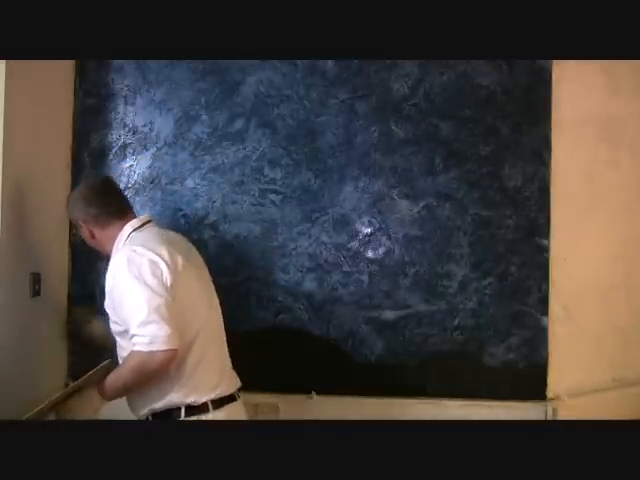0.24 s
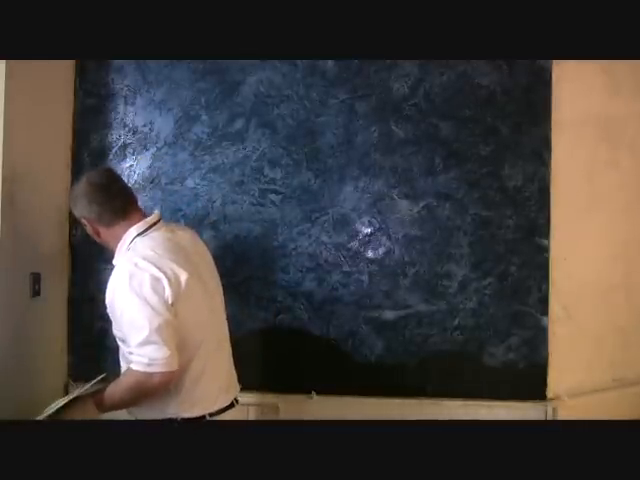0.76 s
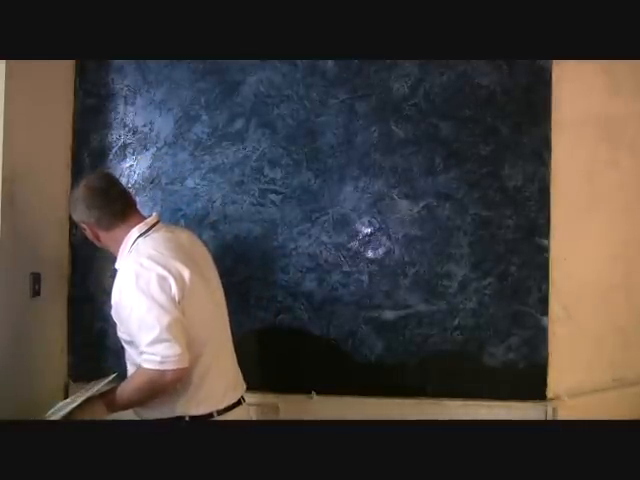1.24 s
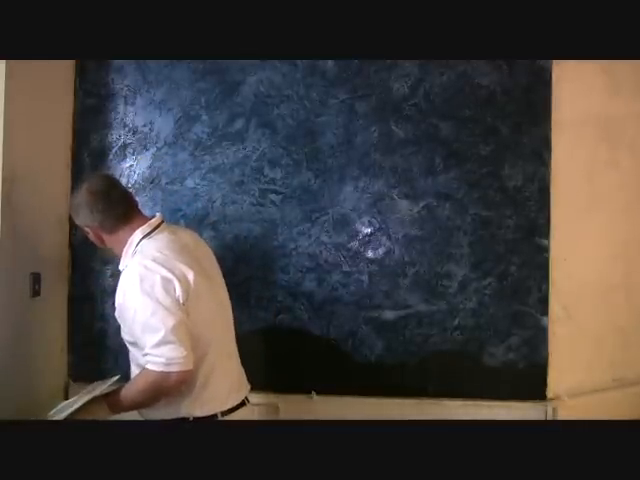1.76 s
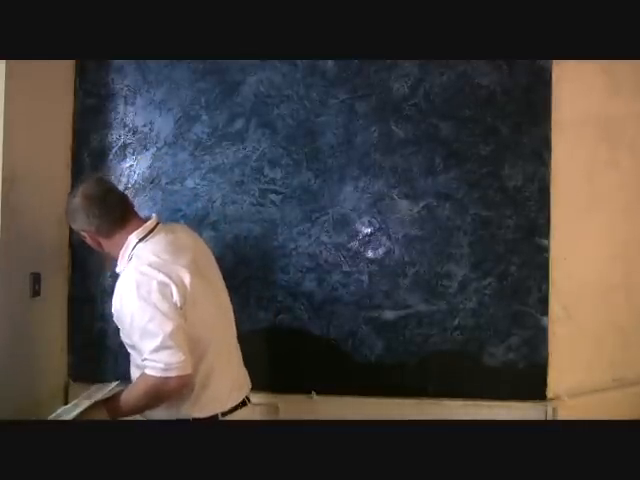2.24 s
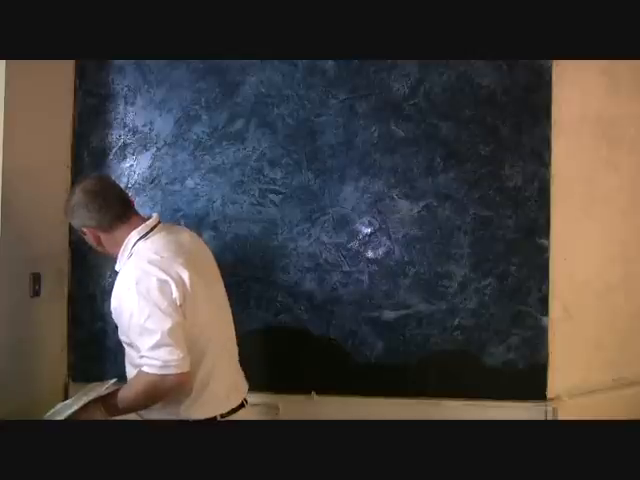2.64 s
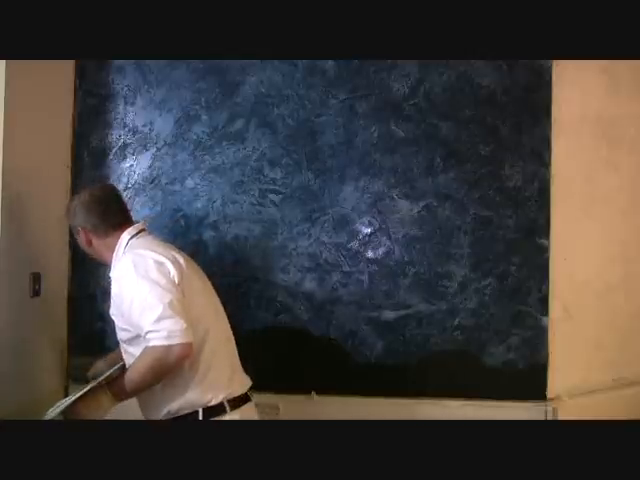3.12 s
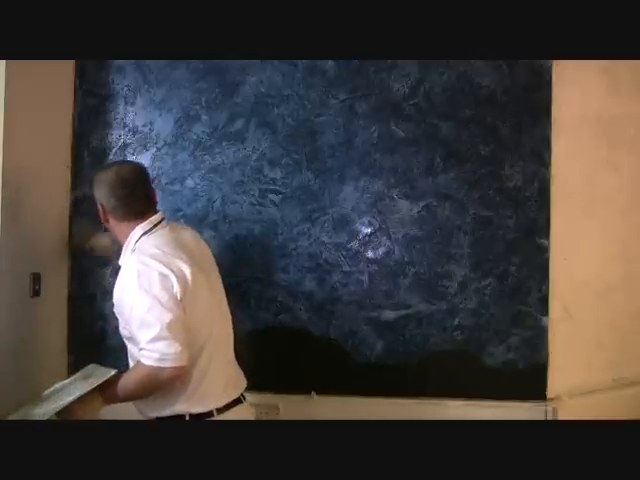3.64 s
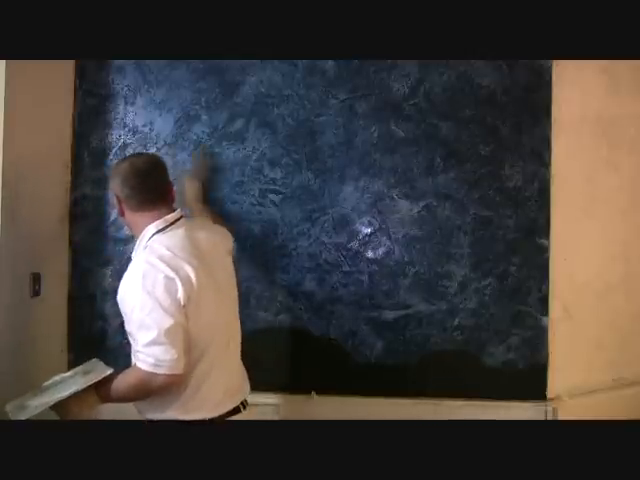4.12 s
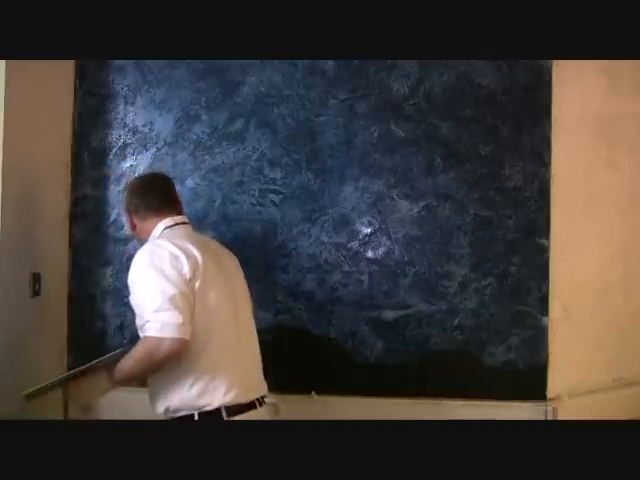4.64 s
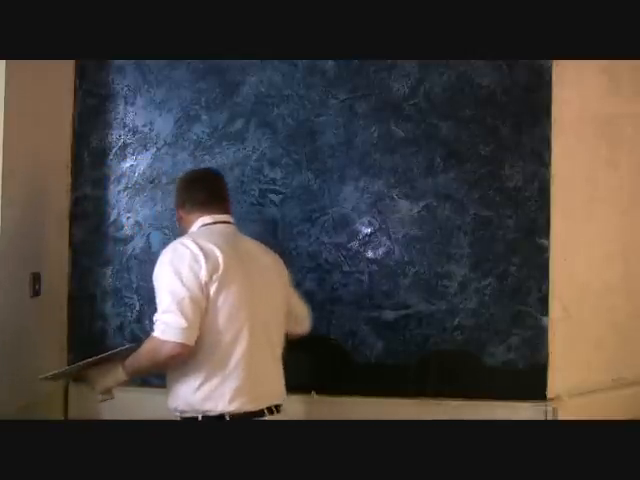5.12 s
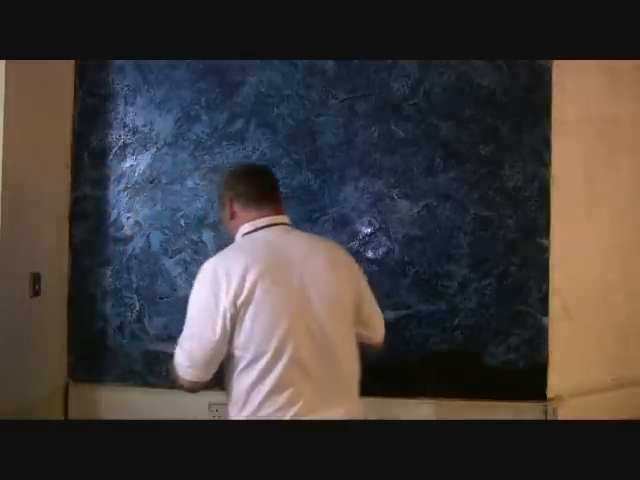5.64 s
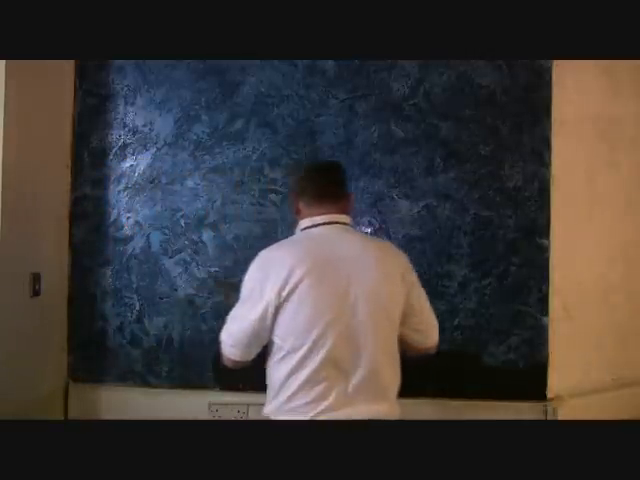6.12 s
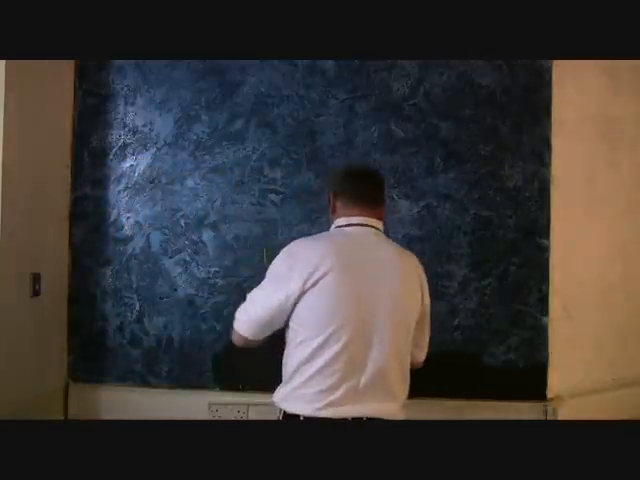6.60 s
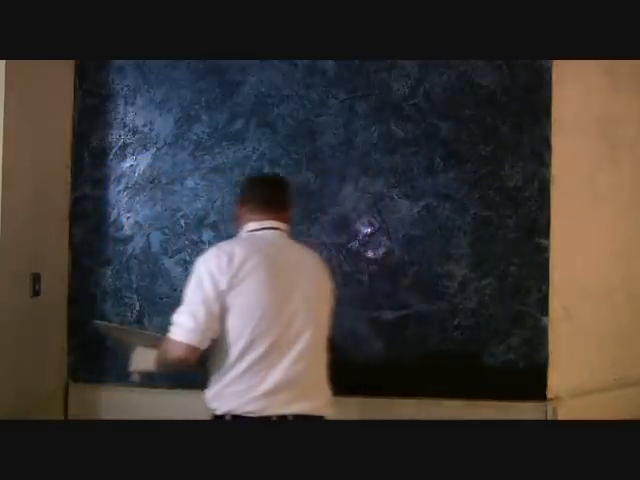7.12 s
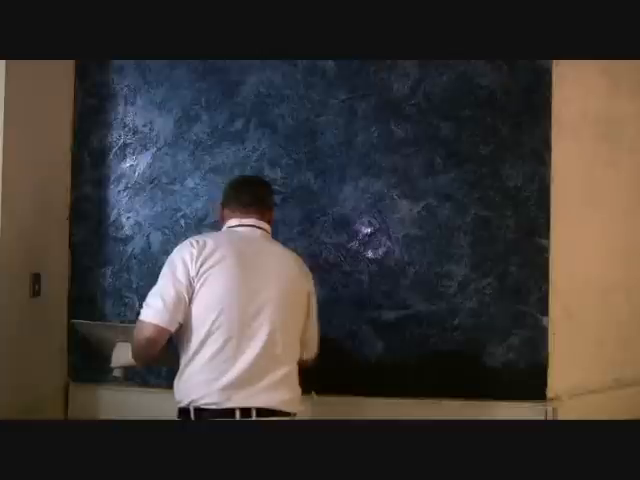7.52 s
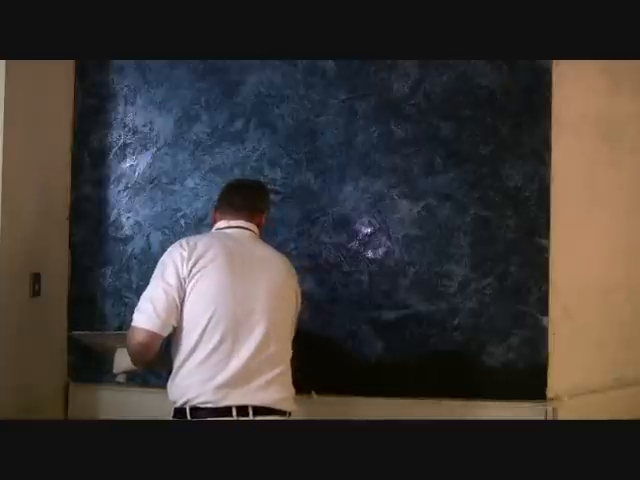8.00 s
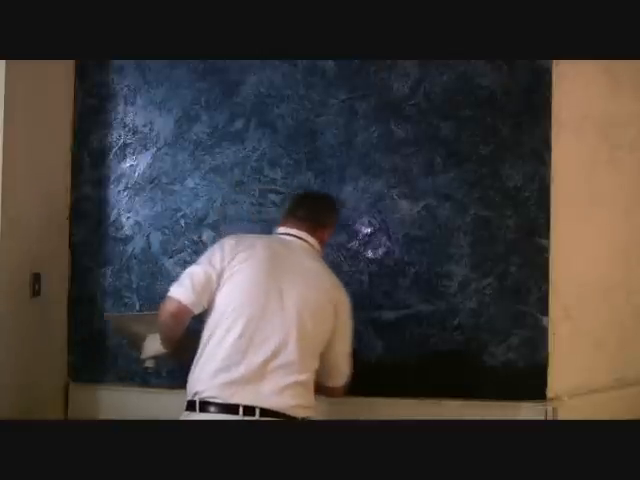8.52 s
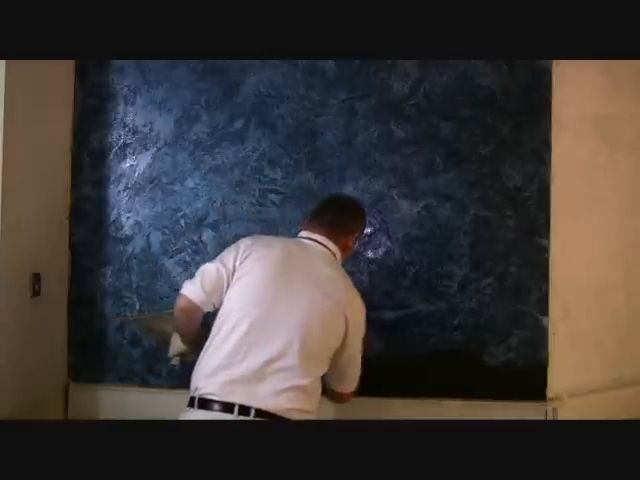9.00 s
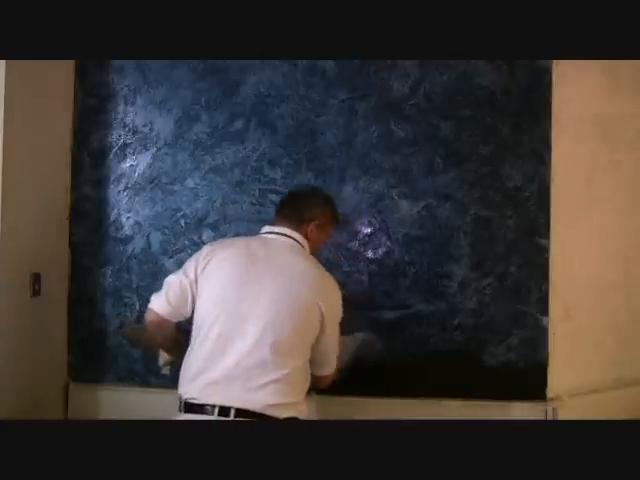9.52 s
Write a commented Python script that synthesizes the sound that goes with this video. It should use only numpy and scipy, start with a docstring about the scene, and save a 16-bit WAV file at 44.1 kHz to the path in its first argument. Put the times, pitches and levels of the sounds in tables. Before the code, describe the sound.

Gritty trowel strokes slap, scrape and break off against a hollow-sounding wall, then harder tool knocks ring out in an empty reverberant room.

```python
"""A steel trowel spreads plaster over a wall in a bare, echoing room, heard from a few metres away.
Each stroke lands with a slap; the blade then sticks and slips, sand hisses under its edge and the wall drums.
The strokes break off as the blade lifts and the room rings on; late on, the tool knocks harder.
Filtered clicks and noise make the friction and landings, decaying sines the knocks, sparse taps the echoes.
Soft thumps of shifting feet, steady rumble and hiss and a deep wavering hum lie underneath."""
import sys
import numpy as np
from scipy import signal
from scipy.fft import rfft, irfft
from scipy.io import wavfile
from scipy.ndimage import uniform_filter1d

SR = 44100
rng = np.random.default_rng(int(sys.argv[2]) if len(sys.argv) > 2 else 0)


def put_to_file(sound):
    """Save the sound as 16-bit audio at rate SR, in the file named by the first command-line argument."""
    columns = np.atleast_2d(sound).T  # one column per channel
    safe = np.clip(columns, -1, 1)
    whole_steps = np.round(safe * 32767)
    wavfile.write(sys.argv[1], SR, whole_steps.astype(np.int16))


N = 429975
TIME = np.arange(N) / SR  # s, one per sample
CLOCK = np.arange(0, N / SR, .001)  # s, coarse steps for the hand's movement

# All levels are relative: spectra are normalised and the layers are balanced in scene().

# Pushes of the blade, overlapping within a long sweep; tilt and hollow pitch hold at mid-push:
# start_s, swell_s, ease_s, rasp_db, sand_db, wall_db, tilt_db_per_octave, hollow_hz
PUSHES = [ (.042, 0.0071, 0.16, -34, -52, -46, -14, 1230), (0.16, 0.057, 0.076, -14, -36, -36, -5, 1320),
          (.24, 0.05, 0.39, -11, -31, -30, 0.5, 1380), (.5, 0.13, 0.34, -19.5, -42.5, -37, 4.5, 1220),
          (0.761, 0.027, 0.047, -16, -34.5, -29, -2, 1205),
          (1.239, .11, 0.058, -12.5, -35.5, -27, -3.5, 1215),
          (1.44, 0.083, 0.045, -19.5, -39, -33.5, -0.5, 1300),
          (1.755, 0.0067, 0.059, -12, -36, -23.5, 3.5, 1366), (1.86, .13, 0.1, -28.5, -44, -45, -7, 1220),
          (2.231, 0.007, 0.095, -12.5, -33.5, -27, 0.5, 1140),
          (2.309, 0.067, 0.064, -11, -37.5, -25.5, -1.5, 1230),
          (2.45, 0.13, 0.04, -13, -32.5, -39.5, 5, 1130), (2.64, 0.025, 0.14, -23.5, -47, -57, 11, 1050),
          (3.215, 0.0056, 0.18, -27, -61, -35.5, -4, 1240), (3.33, 0.083, 0.23, -14, -35, -35, 1, 1220),
          (3.579, 0.12, 0.17, -13.5, -32.5, -25.5, -1, 1340), (3.86, 0.092, 0.33, -17.5, -41, -37, 4, 1246),
          (4.07, .16, .11, -13.5, -34.5, -35.5, 6.5, 1185),
          (4.478, 0.078, 0.038, -24.5, -32.5, -36, -12, 1440),
          (4.845, 0.0082, 0.081, -20.5, -38.5, -41, 5.5, 1120),
          (4.958, 0.12, 0.17, -12, -33.5, -42, 1.5, 1264), (5.215, 0.21, 0.07, -13, -30, -39.5, 2.5, 1190),
          (5.47, 0.047, .12, -18.5, -36.5, -36.5, 3.5, 1130),
          (5.957, 0.069, 0.074, -36, -35.5, -37.5, -9, 1570), (6.2, 0.2, 0.28, -58, -56.5, -65, -4, 1500),
          (6.512, 0.0034, 0.13, -18.5, -25, -25, 13, 1480), (6.72, 0.043, 0.011, -25, -27.5, -32, -5, 1950),
          (6.772, 0.011, 0.017, -30, -21.5, -31, -8, 1950), (7.17, 0.066, 0.16, -58, -47, -47.5, -11, 1300),
          (7.332, 0.083, .02, -32.5, -35.5, -52, -4, 1270), (7.408, 0.029, 0.15, -21, -28, -48, -6, 1480),
          (7.6, 0.12, 0.15, -24.5, -34.5, -35.5, -2.5, 1460), (8.169, 0.067, 0.09, -24, -38, -42, -9, 910),
          (8.235, 0.22, 0.33, -16.5, -28, -32.5, 0.5, 1300), (8.73, 0.074, 0.19, -26, -35.5, -35, -3, 1270),
          (9.296, 0.063, 0.11, -21, -31, -27.5, 4, 1850), (9.47, 0.06, 0.12, -31, -39.5, -52, -0.5, 1740),
          (9.62, 0.073, .08, -30, -48, -37.5, -1.5, 1200)]
RASP_DB, SAND_DB, WALL_DB, TILT, HOLLOW_HZ = range(3, 8)  # columns of PUSHES
# The blade lands on the plaster: start_s, slap_db, sand_db, thud_db
LANDINGS = [ (.039, -26.5, -50, -32.5), (.149, -33, -48, -50), (.166, -22.5, -49, -41),
            (0.954, -51, -33.5, -55), (1.237, -13, -36.5, -42), (1.755, -14, -28.5, -44),
            (2.231, -12, -27.5, -45), (3.212, -23.5, -56, -33), (3.308, -27, -47, -51),
            (3.332, -10, -32.5, -75), (4.845, -37, -57, -53), (4.943, -23, -56, -33.5),
            (5.982, -30, -32, -48), (6.175, -40, -44.5, -61), (6.513, -14, -18.5, -45),
            (6.532, -12, -43, -16.5), (6.776, -19.5, -13.5, -20), (7.018, -29, -39, -29.5),
            (8.165, -31, -55, -32), (8.814, -25, -35, -18), (9.174, -39.5, -48, -34),
            (9.291, -16.5, -30, -14), (9.361, -19, -34, -39)]
SLAP_DB, CRACK_DB, THUD_DB = range(1, 4)  # columns of LANDINGS

# Blade pressed on wet plaster: pitch_hz, level_db
RASP_SPECTRUM = [(150, -57.5), (300, -20), (450, -19.5), (590, -1.5), (670, -5), (850, -1.5), (1100, -3.5),
                 (1400, -4.5), (1650, -2), (2100, -8), (2600, -20), (3300, -36), (6000, -43), (15000, -78)]
# Narrow resonances of the pressed blade: pitch_hz, width_hz, lift_db
BLADE_PEAKS = [(588, 35, 4), (714, 25, 3), (1225, 80, 1), (4085, 60, 3), (5210, 40, 1.5), (6412, 40, 1.5)]
# Sand cracking under the edge: pitch_hz, level_db
SAND_SPECTRUM = [(300, -34.5), (900, 7), (2200, 12), (3200, 1.5), (4200, -0.5), (5000, -3.5), (7000, -7),
                 (9800, -8.5), (11500, -14), (13500, -24), (15800, -34)]
# The steel edge cracking onto the wall: pitch_hz, level_db
CRACK_SPECTRUM = [(400, -34), (1500, 0), (3200, -13), (4300, 2.5), (7000, 2), (10000, -0.5), (12000, -11),
                  (15800, -44)]
# The flat blade slapping down: pitch_hz, level_db
SLAP_SPECTRUM = [(120, -13.5), (300, -16), (520, -4), (800, 4), (1300, 1.5), (2000, -1), (2600, -11),
                 (3300, -19), (8000, -37)]
# The wall drumming: pitch_hz, level_db
WALL_SPECTRUM = [(40, -16), (80, -33), (105, -11.5), (135, -21.5), (180, -13.5), (220, -1.5), (280, 4),
                 (360, 5.5), (470, 3.5), (700, 2.5), (1500, -57), (5000, -102)]

# The tool knocks; where it is struck decides which modes answer most: start_s, level_db, favoured_hz
KNOCKS = [(2.36, -28, 258), (5.984, -31, 490), (5.986, -33, 310), (6.516, -24, 454), (6.776, -31, 2000),
          (6.78, -29, 4200), (8.166, -23.5, 985), (8.814, -21.5, 870), (8.868, -19.5, 940),
          (9.296, -15.5, 325), (9.305, -19, 205), (9.32, -15, 1200), (9.361, -20, 1950)]
# Modes of the tool against the hollow wall: pitch_hz, level_db, t60_s
MODES = [(206, 1, .28), (255, -6, .3), (310, -6, .45), (371, -2, .35), (488, 0, .45), (708, -3, .35),
         (904, 0, .5), (975, -6, .35), (1200, -2, .3), (1810, -3, .35), (1945, -1, .35), (2105, -1, .3),
         (4085, -4, .3), (4188, -2, .28), (5210, -6, .25)]
# Feet shift on the floor: start_s, level_db
STEPS = [(6.26, -38.5), (6.625, -34), (6.69, -32.5), (6.76, -39), (7.02, -41), (8.57, -32.5), (8.65, -35),
         (8.72, -40), (8.818, -30), (9.315, -34), (9.67, -47.5)]
# The floor under a shoe: pitch_hz, level_db
FOOT_SPECTRUM = [(25, -25), (60, -5), (100, -5.5), (155, -0.5), (230, -4), (400, -28), (1500, -46)]

# Decay of the bare room: pitch_hz, t60_s
ROOM_DECAY = [(150, 0.62), (530, 0.74), (1400, 0.71), (3700, 0.73), (9700, 0.5), (15000, 0.15)]
# Side level of the echoes between the microphones: pitch_hz, side_db
STEREO_WIDTH = [(30, -15), (70, -19), (130, -8.5), (450, -16), (1100, -17), (2000, -14), (4000, -9.5),
                (8000, -5), (13000, -2)]
# Background rumble and hiss: pitch_hz, level_db
FLOOR_SPECTRUM = [(15, -9.5), (29, 4.5), (42, -17.5), (75, -17), (120, -8.5), (300, -10), (650, -15.5),
                  (1100, -8), (2000, -25), (3500, -28), (10000, -34.5), (11200, -34), (12500, -44),
                  (15800, -56)]

MIDDLE_BAND, TREBLE_BAND = (450, 2700), (3000, 12000)  # Hz, where a layer's level is set
SWELL_DB, EASE_DB, LIFT_DB_PER_S = 6, 10, 354  # pressure: the blade presses harder, eases off, lifts
BITE_SHARE = 0.1  # of the swelling time, until the edge is fully in the plaster
SAND_GROWTH, WALL_GROWTH = 1.43, 1.22  # dB of sand and of drumming per dB of pressure
STEEPEN_DB, HOLLOW_SAG_HZ = 3, 70  # over one push: brighter by dB per octave, hollow lower by Hz
FLOOR_DB, HUM_HZ, HUM_DB = -46, 32.3, -63
EDGE_HZ = 15800  # the recorder's upper limit


def rasp():
    """The blade sticks and slips in uneven bunches and sings hollowly; a steeper blade sounds brighter."""
    chatter = unit(amp(1.9 * wander(per_s=75)))
    friction = chatter * grains(per_s=520, spread_db=2, smooth=.15)
    slips = colour(friction, RASP_SPECTRUM, MIDDLE_BAND, BLADE_PEAKS)
    hollow_hz = angle(HOLLOW_HZ, drift=-HOLLOW_SAG_HZ) * (1 + 0.079 * wander(per_s=25))
    hollow = resonate(slips, hollow_hz, width=480)
    hollow = resonate(hollow, hollow_hz, width=480)
    sung = .42 * slips + hollow
    tilt = np.clip(angle(TILT, drift=STEEPEN_DB), -6, 6)  # dB per octave

    def brightness(hz, t):
        octaves = np.log2(np.clip(hz, 550, 2300) / 1200)
        return np.interp(t, TIME, tilt) * octaves

    sound = shape(sung, brightness)
    # the angle sets colour, not loudness
    power = abs(uniform_filter1d(sound ** 2, size=2500))
    return drive(RASP_DB) * sound / np.sqrt(power + 1e-9)


def sand():
    """Grains of sand crack under the sliding edge, and sharply where it lands."""
    sliding = drive(SAND_DB, growth=SAND_GROWTH) * grains(per_s=1800, spread_db=0.0, smooth=0.34)
    landing = bursts(LANDINGS, CRACK_DB, settle_s=0.0059)
    landing = landing * grains(per_s=1500, spread_db=-6.5, smooth=0.053)
    hiss = colour(sliding, SAND_SPECTRUM, TREBLE_BAND, BLADE_PEAKS)
    return hiss + colour(landing, CRACK_SPECTRUM, TREBLE_BAND, BLADE_PEAKS)


def slaps():
    """The flat of the blade meets wet plaster in short bursts of dense noise."""
    force = bursts(LANDINGS, SLAP_DB, settle_s=0.0081)
    force = force * grains(per_s=5400, spread_db=6.0, smooth=0.99)
    return colour(force, SLAP_SPECTRUM, MIDDLE_BAND)


def wall():
    """Lumps of plaster and the landings shake the wall, which drums in the bass and low middle."""
    force = drive(WALL_DB, growth=WALL_GROWTH) * grains(per_s=220, spread_db=-3.5, smooth=0.75)
    thuds = bursts(LANDINGS, THUD_DB, settle_s=0.011) * rng.standard_normal(N)
    return colour(force + thuds, WALL_SPECTRUM, (90, 420))


def knocks():
    """Each knock rings the modes, most those near its favoured pitch; the flexing tool blurs their pitch."""
    hz, db, t60 = np.transpose(MODES)[:, :, None]
    t, out = np.arange(SR) / SR, np.zeros(N + SR)
    onset = 1 - np.exp(-t / 0.0015)
    for s, level_db, favoured_hz in KNOCKS:
        missed_db = np.minimum(22 * abs(np.log2(hz / favoured_hz)), 40)
        flexed = np.cumsum(1 + .012 * wander(per_s=150)[:SR]) / SR  # time bent by the flexing
        tones = np.sin(2 * np.pi * (hz * flexed + rng.random(hz.shape)))
        ring = amp(db - missed_db - 60 * t / t60) * tones
        start = round(s * SR)
        out[start:start + SR] += amp(level_db) * ring.sum(0) * onset
    return out[:N]


def steps():
    """Soft thumps as the plasterer's weight shifts: brief bursts of low noise."""
    force = bursts(STEPS, 1, settle_s=.025) * rng.standard_normal(N)
    return colour(force, FOOT_SPECTRUM, (40, 300))


def echoes(x, moves_per_s):
    """Dense reflections; their pattern changes as the trowel travels along the wall."""
    t, out = np.arange(SR) / SR, np.zeros(N)
    for k in range(3):
        # about 3500 reflections a second, after a 2 ms gap
        taps = rng.choice([-1., 1.], SR) * (rng.random(SR) < 3500 / SR) * (t > .002)
        taps = taps / np.linalg.norm(taps * amp(-60 * t / 0.89))
        tail = shape(taps, lambda hz, s: -60 * s / read(ROOM_DECAY, hz))
        # fade between three patterns; the squares sum to 1
        place = np.sqrt(2 / 3) * np.cos(np.pi * (moves_per_s * TIME + k / 3))
        out += signal.oaconvolve(x * place, tail)[:N]
    return out


def widen(x):
    """The difference between the two microphones: weak in the bass and middle, strong in the treble."""
    return irfft(rfft(x) * amp(read(STEREO_WIDTH, np.fft.rfftfreq(N, 1 / SR))), N)


def background():
    """Steady rumble and hiss of the room, over a deep wavering hum."""
    middle, side = (unit(colour(rng.standard_normal(N), FLOOR_SPECTRUM, (0, SR))) for _ in range(2))
    side = amp(9.5) * widen(side)
    hum = np.sqrt(2) * np.sin(2 * np.pi * HUM_HZ * TIME + 0.53 * wander(per_s=3))
    return amp(FLOOR_DB) * np.array([middle + side, middle - side]) + amp(HUM_DB) * hum


def pushes():
    """Pressure (top 1) and progress (-.5 to .5) of every push over time, one row each."""
    start, swell, ease = np.transpose(PUSHES)[:3, :, None]
    age = CLOCK - start
    db = -SWELL_DB * np.clip(1 - age / swell, 0, 1)
    db = db - EASE_DB * np.clip((age - swell) / ease, 0, 1)
    db = db - LIFT_DB_PER_S * np.maximum(age - swell - ease, 0)
    bite = np.clip(age / (BITE_SHARE * swell), 0, 1)
    progress = np.clip(age / (swell + ease), 0, 1) - .5
    return amp(db) * bite, progress


def drive(column, growth=1):
    """How hard the pushes drive one layer: its dB column times the pressure, summed as power."""
    gains = amp(np.transpose(PUSHES)[column, :, None]) * pushes()[0] ** growth
    return np.interp(TIME, CLOCK, np.linalg.norm(gains, axis=0))


def angle(column, drift):
    """A column set by the blade's angle; it drifts through each push, and the firmest push leads."""
    pressure, progress = pushes()
    value = np.transpose(PUSHES)[column, :, None] + drift * progress
    return np.interp(TIME, CLOCK, np.average(value, axis=0, weights=pressure ** 2 + 1e-12))


def bursts(rows, column, settle_s):
    """Each row starts a sudden burst of force that dies as things settle."""
    rows, kicks = np.array(rows), np.zeros(N)
    kicks[np.round(rows[:, 0] * SR).astype(int)] = amp(rows[:, column]) ** 2
    # settle_s is the decay time of the power
    power = signal.lfilter([1], [1, -np.exp(-1 / (settle_s * SR))], kicks + 1e-16)
    return np.sqrt(power)


def grains(per_s, spread_db, smooth):
    """Random clicks of uneven size over a share of smooth friction."""
    size = amp(spread_db * np.minimum(rng.exponential(1, N), 3)) * rng.choice([-1, 1], N)
    clicks = unit(size * (rng.random(N) < per_s / SR))
    share = np.clip(smooth, 0, 1)
    return np.sqrt(1 - share) * clicks + np.sqrt(share) * rng.standard_normal(N)


def resonate(x, hz, width):
    """A resonance of gain 1 that follows the curve hz: shift it to zero, low-pass, shift back."""
    turn = np.exp(2j * np.pi * np.cumsum(hz) / SR)
    r = np.exp(-np.pi * width / SR)
    return 2 * (turn * signal.lfilter([1 - r], [1, -r], x / turn + 1e-18)).real


def colour(x, points, band, peaks=()):
    """Causal filter with the given spectrum; white noise of rms 1 leaves with rms 1 inside the band."""
    size = 4096
    hz = abs(np.fft.fftfreq(size, 1 / SR))
    db = read(points, hz)
    for f, width, lift in peaks:
        db = db + lift / (1 + (2 * (hz - f) / width) ** 2)
    gain = amp(db)
    gain = gain / np.sqrt(np.mean(gain ** 2 * (hz >= band[0]) * (hz <= band[1])))
    # minimum phase, from the Hilbert transform of the log gain
    taps = np.fft.ifft(np.exp(np.conj(signal.hilbert(np.log(gain))))).real
    return signal.oaconvolve(x, taps[:size // 2])[:N]


def shape(x, rule):
    """Applies a gain in dB, rule(Hz column, s row), to short-time spectra."""
    hz, t, z = signal.stft(x, SR, nperseg=256, noverlap=192)
    z = z * amp(rule(hz[:, None], t))
    return signal.istft(z, SR, nperseg=256, noverlap=192)[1][:len(x)]


def wander(per_s):
    """Smooth chance of rms 1: straight lines between per_s random points a second."""
    knots = rng.standard_normal(8192)
    return unit(np.interp(TIME * per_s, np.arange(len(knots)), knots))


def read(points, hz):
    """Reads a table on a log-frequency axis."""
    f, value = np.transpose(points)
    return np.interp(np.log(hz + 1), np.log(f), value)


def amp(db):
    """Turns dB into an amplitude factor."""
    return 10 ** (np.asarray(db) / 20)


def unit(x):
    """Scales to rms 1."""
    return x / np.sqrt(np.mean(x ** 2) + 1e-20)


def scene():
    """Trowel and wall in the room; two close microphones differ mainly in the treble."""
    # lumps in the plaster jolt the blade
    surge = unit(amp(1.6 * wander(per_s=35)))
    body = surge * rasp() + amp(0.8) * slaps() + amp(-2.5) * wall() + steps()
    hiss = np.sqrt(surge) * sand()
    ring = knocks()

    def reverberate():
        # short waves feel the trowel's travel most, so the echoes of the hiss change fastest
        return echoes(body + 0.84 * ring, moves_per_s=0.7846) + echoes(hiss, moves_per_s=11)

    room, across = reverberate(), reverberate()
    middle = amp(-4.5) * (body + hiss) + amp(0.5) * ring + amp(-2.5) * room
    side = widen(across)
    balance = amp([[.15], [-.15]])  # left slightly louder
    return np.array([middle + side, middle - side]) * balance + background()


def record(dry):
    """The recorder's band limit: a steep low-pass."""
    lowpass = signal.firwin(511, EDGE_HZ, window=("kaiser", 10), fs=SR)
    return signal.oaconvolve(dry, lowpass[None], "same", axes=1)


dry = scene()
out = record(dry)
put_to_file(out)
```